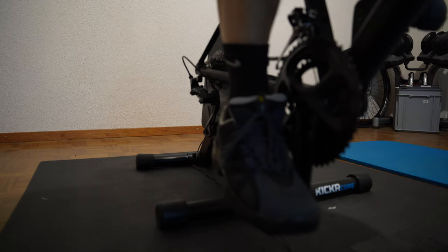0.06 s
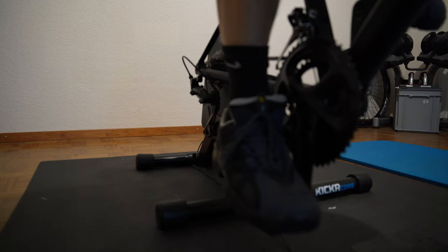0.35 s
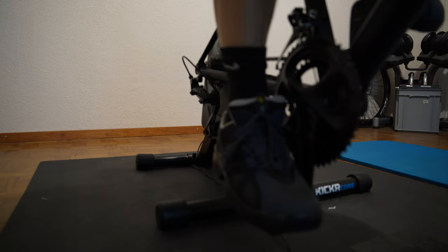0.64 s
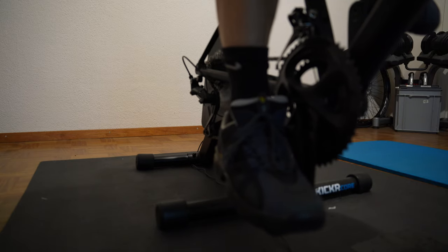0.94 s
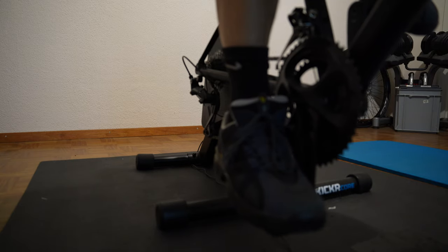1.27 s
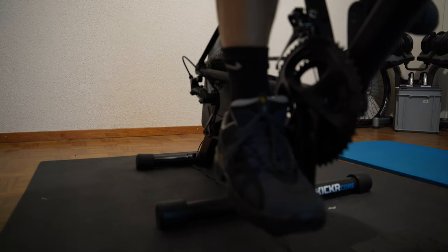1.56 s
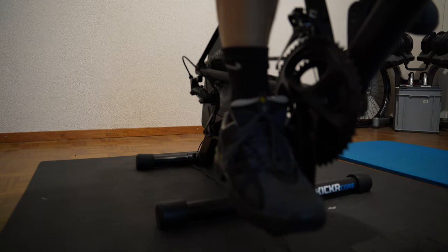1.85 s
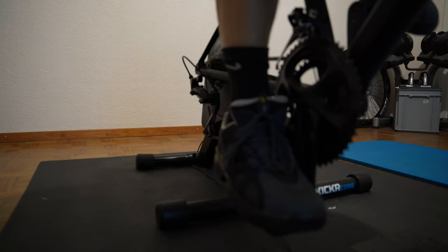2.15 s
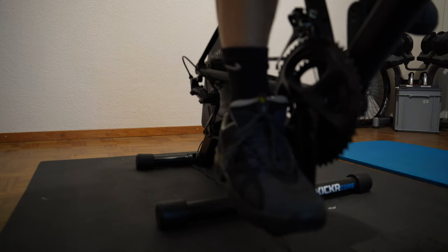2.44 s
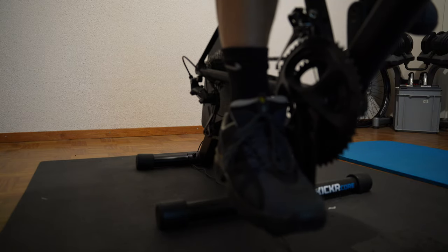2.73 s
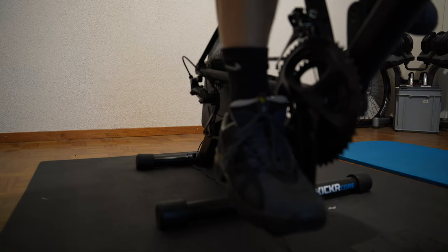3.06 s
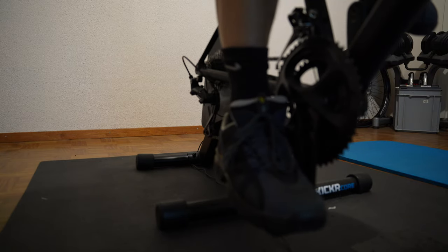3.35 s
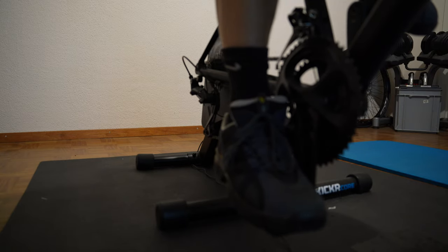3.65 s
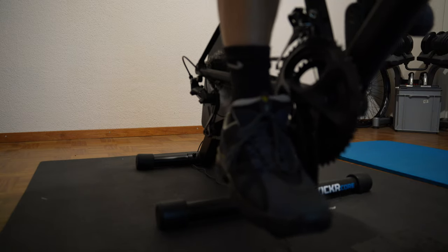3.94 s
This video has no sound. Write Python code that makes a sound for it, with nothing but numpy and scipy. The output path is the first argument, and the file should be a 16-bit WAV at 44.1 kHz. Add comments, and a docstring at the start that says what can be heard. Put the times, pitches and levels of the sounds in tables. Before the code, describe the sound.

Fast, bright ratchet clicking of a bike coasting on a trainer, slowing slightly.

```python
"""Bicycle coasting on an indoor trainer

A bare room in stereo, the pedals at rest. As the flywheel slows, the freehub pawls rattle over the
ratchet; their clicks set hub and sprockets ringing, louder once every turn. Underneath are a faint
whirr, the still air of the room and a low rumble that swells in the second half."""
import sys
import numpy as np
from scipy import signal
from scipy.fft import rfft, irfft
from scipy.io import wavfile
from scipy.ndimage import uniform_filter1d

SR = 44100
rng = np.random.default_rng(int(sys.argv[2]) if len(sys.argv) > 2 else 0)


def store_wav(level_fs):
    """Save 16-bit WAV to argv[1]."""
    pcm = np.round(np.clip(np.atleast_2d(level_fs), -1, 1) * 32767)
    wavfile.write(sys.argv[1], SR, pcm.T.astype(np.int16))


N = 176400
TIME = np.arange(N) / SR
TICK_DECAY_S, TICK_ECHO_S, TICK_SIDE_DB = .0007, .016, -2.5


def from_db(db):
    """Decibels to gain."""
    return 10 ** (np.asarray(db) / 20)


def rms_one(x):
    """Each channel scaled to rms 1."""
    return x / np.sqrt(np.mean(x ** 2, axis=-1, keepdims=True) + 1e-20)


def in_time(rows):
    """Straight lines through rows of time in seconds and value."""
    return np.interp(TIME, *np.transpose(rows))


def stereo(pair, side_db):
    """Mid and side to left and right."""
    return pair[0] + from_db(side_db) * pair[1] * np.array([[1], [-1]])


def colour(x, spectrum):
    """Gives a white signal a spectrum in dB per Hz."""
    hz, db = np.transpose(spectrum)
    grid_hz = np.maximum(np.arange(N + 1) * SR / (2 * N), 1)
    gain = from_db(np.interp(np.log(grid_hz), np.log(hz), db)) * np.sqrt(SR / 2)
    return irfft(rfft(rms_one(x), 2 * N) * gain)[..., :N]


def smooth_noise(spectrum, side_db):
    """Steady stereo noise of a given spectrum."""
    return stereo(colour(rng.standard_normal((2, N)), spectrum), side_db)


def drift(rate_hz):
    """Slow random wander in mid and side; rms 1."""
    pole = np.exp(-2 * np.pi * rate_hz / SR)
    wander = signal.lfilter([1], [1, -2 * pole, pole * pole], rng.standard_normal((2, N + SR)))
    return rms_one(wander[:, SR:])


def dying(energy, decay_s):
    """Spreads each burst of energy into a decay of the same sum; already running at the start."""
    pole = np.exp(-1 / (decay_s * SR))
    running = np.hstack([energy[..., -SR // 4:], energy]) + 1e-12
    return signal.lfilter([1 - pole], [1, -pole], running)[..., -N:]


def crunch(energy):
    """Noise that follows the energy of the contacts; mid and side."""
    return np.sqrt(energy) * rng.standard_normal((2, N))


def resonate(x, hz, width_hz):
    """One ringing mode with steep flanks."""
    radius = np.exp(-np.pi * width_hz / SR)
    section = [1, 0.0074, -0.959, 1, -2 * radius * np.cos(2 * np.pi * hz / SR), radius * radius]
    return signal.sosfilt([section] * 2, x)


def sustained(drive, hz, width_hz, even, window_s=.054):
    """A mode already ringing at the start, the share `even` of its level swings taken out; rms 1."""
    running = np.hstack([drive[:, -SR // 4:], drive])
    mode = rms_one(resonate(running, hz, width_hz)[:, -N:])
    power = np.abs(uniform_filter1d(mode ** 2, int(window_s * SR), axis=1)) + 1e-9
    return rms_one(mode / power ** (even / 2))


def room(x, tail_db, t60_s=.52, early_s=.0019, early_db=-4):
    """Direct sound, quick reflections off frame and floor, and a diffuse tail; mid and side."""
    t = TIME[:SR // 2]
    early = rms_one(rng.standard_normal((2, len(t))) * np.exp(-t / early_s))
    tail = rms_one(rng.standard_normal((2, len(t))) * from_db(-60 * t / t60_s))
    response = (from_db(early_db) * early + from_db(tail_db) * tail) / np.sqrt(len(t))
    response[:, 0] += 1
    running = np.hstack([x[:, len(t):0:-1], x])   # the room is already sounding at the start
    return signal.fftconvolve(running, response, axes=1)[:, len(t):len(t) + N]


def room_tone():
    """The still air of the room, almost mono."""
    # Spectrum of the air. Each row: frequency in Hz, density in dB per Hz.
    spectrum = [(20, -132), (42, -122), (75, -104), (120, -108), (195, -106), (250, -119), (320, -113),
                (420, -119), (700, -118), (3000, -122), (16000, -126)]
    return smooth_noise(spectrum, side_db=-32)


def flywheel_whirr():
    """The flywheel whirrs faintly in a band around 600 Hz."""
    # Spectrum of the whirr. Each row: frequency in Hz, density in dB per Hz before the gain.
    spectrum = [(250, -125), (450, -116), (540, -102), (630, -103), (750, -109), (1000, -116), (2000, -130)]
    # Its rise and fall. Each row: time in seconds, gain in dB.
    gain = [(0, 5), (.3, -0.5), (.65, -3.5), (.85, 2.5), (1.38, 3.5), (1.55, -4), (2.4, -3.5), (4, -7.5)]
    return smooth_noise(spectrum, side_db=-11) * from_db(in_time(gain))


def frame_rumble(side_db=-26):
    """Low rumble through the frame, with one humming resonance that rises with it."""
    # Spectrum of the rumble. Each row: frequency in Hz, density in dB per Hz before the gain.
    spectrum = [(25, -130), (50, -120), (72, -105), (100, -95), (116, -107), (136, -99), (165, -100),
                (186, -99), (205, -105), (222, -116), (400, -135)]
    # Swell of rumble and hum. Each row: time in seconds, gain in dB.
    gain = [(0, -7), (.05, -2), (.17, -16), (.8, -22), (1.35, -12), (1.7, -15), (1.95, -13.5), (2.38, -27),
            (2.53, -6), (2.82, 9.5), (3.03, 1.5), (3.16, 4), (3.26, -2), (3.35, 3), (3.42, 0), (3.58, 2.5),
            (3.65, -7), (3.79, 7), (3.85, -4), (3.96, 4), (4, -10)]
    mode = sustained(rng.standard_normal((2, N)), hz=165.2, width_hz=5.5, even=.82)
    hum = from_db(-75.5) * stereo(mode, side_db)
    return (smooth_noise(spectrum, side_db) + hum) * from_db(in_time(gain))


def stray_ticks(decay_s=.00075):
    """Now and then the drivetrain gives one sharp, broad tick."""
    # The ticks. Each row: start in seconds, relative level in dB.
    ticks = [(1.4666, -2), (1.578, 0), (3.7733, 3), (3.794, -3)]
    # Their spectrum. Each row: frequency in Hz, relative density in dB per Hz.
    spectrum = [(1500, -110), (4000, -97), (6000, -102), (9000, -100), (15000, -90)]
    energy = sum(from_db(db) ** 2 * (TIME > start) * np.exp(-abs(TIME - start) / decay_s)
                 for start, db in ticks)
    return stereo(colour(crunch(energy), spectrum), TICK_SIDE_DB) * np.sqrt(energy.mean())


def whine(drive):
    """A faint, narrow mode, fed by the clicks, that comes and goes."""
    # Course of the whine. Each row: time in seconds, relative level in dB.
    level = [(0,-79),(.25,-81),(.5,-72.5),(.66,-102),(.91,-68.5),(1.03,-81),(1.55,-93),(1.63,-78),(1.8,-72.5),(1.92,-99),(2.5,-91),(2.66,-78),(2.92,-96),(3.27,-79),(3.5,-90),(4,-86)]
    mode = sustained(drive, hz=923, width_hz=13, even=.5)
    return stereo(mode, side_db=-3) * from_db(in_time(level) - 3.5)


def hub_sizzle(drive):
    """A broad mode of the hub rings briefly on every click."""
    # The sizzle surges and sinks. Each row: time in seconds, relative level in dB.
    level = [(0.0, -58), (0.18, -71), (0.32, -54.5), (0.58, -70), (0.62, -52), (0.65, -68), (0.8, -54.5),
             (0.83, -61.5), (1.29, -58.5), (1.34, -68), (1.51, -58), (2.09, -64.5), (2.13, -54.5),
             (2.23, -68), (2.26, -56), (2.44, -78), (2.52, -59), (2.77, -58.5), (2.97, -78), (3.0, -61),
             (3.06, -68), (3.11, -54), (3.43, -69.5), (3.46, -57), (3.54, -66), (3.58, -59), (3.75, -65),
             (3.78, -56), (3.84, -71), (4.0, -62)]
    mode = sustained(drive, hz=4852, width_hz=150, even=.7)
    return stereo(mode, side_db=-2) * from_db(in_time(level) - 2)


def singing(drive, hz=3542.5, wander_hz=8, flutter_db=1.2):
    """The purest ring, probably the largest sprocket: kicked by the clicks, wavering a little."""
    # Its short bursts. Each row: time in seconds, relative level in dB.
    level = [(0.0, -55.5), (0.12, -63), (0.17, -56.5), (0.19, -74), (0.24, -56), (0.28, -68), (0.32, -55),
             (0.38, -63), (0.5, -53), (0.53, -65), (0.69, -59), (0.71, -80), (0.73, -54), (0.79, -51.5),
             (0.82, -64), (0.88, -49.5), (0.92, -67), (0.95, -52), (0.98, -67), (1.04, -54), (1.07, -63),
             (1.14, -56), (1.18, -69), (1.2, -55.5), (1.27, -50), (1.38, -67), (1.43, -57), (1.65, -62.5),
             (1.68, -49.5), (1.76, -59), (1.83, -50), (1.98, -66.5), (2.07, -55.5), (2.29, -56),
             (2.33, -66), (2.38, -55.5), (2.45, -64), (2.54, -57.5), (2.6, -63), (2.63, -56.5), (2.95, -53),
             (3.01, -71), (3.16, -49), (3.19, -84), (3.22, -51), (3.32, -56), (3.35, -72), (3.41, -57),
             (3.48, -83), (3.55, -52.5), (3.59, -64), (3.66, -50.5), (3.7, -61), (3.75, -48.5),
             (3.92, -58.5), (4.0, -57.5)]
    phase = 2 * np.pi * np.cumsum(hz + wander_hz * drift(rate_hz=24), axis=1) / SR
    kicked = np.sqrt(dying(drive ** 2, decay_s=.046))
    flutter = from_db(flutter_db * drift(rate_hz=24))
    tone = rms_one(np.sin(phase) * kicked * flutter)
    return stereo(tone, side_db=-13) * from_db(in_time(level) + .5)


def metal_ring(drive, turn, faster):
    """Hub and sprockets, kept ringing by the clicks; their modes swell or dip once a turn."""
    # Modes of the metal. Each row: frequency in Hz, width in Hz, base level in dB, side gain in dB,
    # swing over a turn in dB.
    modes = [(536, 35, -95.5, -15, 4.5), (619, 28, -99.5, -7, 3.5), (1029, 8.9, -89.5, -14, 11),
             (1322, 100, -71.5, -1, -2.5), (1412, 24, -69, -6.5, 3), (1649, 32, -72.5, -15, -1.5),
             (1812.5, 56, -68.5, -9.5, -2), (2057, 39, -74.5, -8.5, 5.5), (2308, 108, -69, -1.5, 0),
             (2685, 130, -69.5, 0, 1), (3545, 126, -63.5, -0.5, 1.5), (4636, 28, -78.5, 5.5, 10),
             (4807, 496, -61.5, 3.5, 0), (8615, 98, -59.5, 5, 1.5), (8676, 35, -57, -16, 1),
             (9370, 470, -62.5, 1.5, 1), (10800, 200, -66.5, 4, 1.5)]
    ring = 0
    for hz, width_hz, db, side_db, swing_db in modes:
        mode = sustained(drive, hz, width_hz, even=.16)
        ring = ring + stereo(mode, side_db) * from_db(db + swing_db * turn + .1257 * faster)
    return ring


def strikes(times, db, scatter_db=1.2):
    """An impulse of energy for each pawl contact, each with a strength of its own."""
    gains = from_db(db + scatter_db * rng.standard_normal(times.shape))
    inside = (times > 0) & (times < TIME[-1])
    return np.bincount((times[inside] * SR).astype(int), gains[inside] ** 2, N)


def knocks(energy, tail_db):
    """Each contact as a short burst of noise, heard through the room; mid and side."""
    return room(crunch(dying(energy, decay_s=.0008)), tail_db)


def snaps(energy, echo_db):
    """Each contact as a snap of noise with a brief wash of room echo; mid and side."""
    echoes = from_db(echo_db) ** 2 * dying(energy, TICK_ECHO_S)
    return crunch(dying(energy, TICK_DECAY_S) + echoes)


def pawl_pings(energy):
    """The small pawls ring high for a moment as they land and bounce."""
    # Modes of the pawls. Each row: frequency in Hz, width in Hz, level in dB, side gain in dB.
    modes = [(13100, 380, -63, -2), (15530, 520, -60.5, 0)]
    drive = snaps(energy, echo_db=-1.5)
    return sum(stereo(rms_one(resonate(drive, hz, width_hz)), side_db) * from_db(db)
               for hz, width_hz, db, side_db in modes)


def housing_clatter(energy):
    """The contacts knock the housing into a midrange clatter."""
    # Spectrum of the housing. Each row: frequency in Hz, base density in dB per Hz.
    spectrum = [(60, -155), (400, -123), (850, -114), (1050, -101), (1220, -90.5), (1380, -87.5),
                (1550, -95.5), (1750, -89.5), (1950, -93), (2150, -94), (2700, -96), (3100, -101.5),
                (3700, -102), (4300, -108), (5500, -130)]
    return stereo(colour(knocks(energy, tail_db=2.5), spectrum), side_db=-5)


def pawl_ticks(energy, rise_s=.00025):
    """The bright tick of the pawls striking the ratchet."""
    # Spectrum of the tick. Each row: frequency in Hz, base density in dB per Hz.
    spectrum = [(3000, -120), (4000, -109), (5100, -99), (5400, -108), (5750, -121), (6400, -121),
                (6900, -104), (7600, -100), (7950, -92.5), (8300, -94.5), (9400, -95.5), (10100, -103),
                (10800, -96.5), (11600, -92), (12150, -94), (12700, -92.5), (13600, -92), (14200, -96.5),
                (14800, -92.5), (15600, -96.5)]
    clicks = snaps(dying(energy, rise_s), echo_db=4.8)
    return stereo(colour(clicks, spectrum), TICK_SIDE_DB)


def freehub(teeth=24, start_tooth=.186, hardest_tooth=21.9, jitter_s=.0004):
    """The pawls drop off every tooth: a bright tick, a clatter in the housing and ringing metal."""
    # The slowing ratchet. Each row: time in seconds, speed in teeth per second.
    ratchet_speed = [(0, 57.23), (.2, 56.84), (.42, 53.81), (.68, 56.25), (.9, 53.91), (1.2, 52.93),
                     (1.55, 51.44), (1.9, 50.61), (2.3, 49.44), (2.7, 48.29), (3.2, 46.74), (3.7, 45.32),
                     (4, 45.77)]
    # Pawl contacts on each tooth. Each row: delay in teeth, then relative levels in dB of tick,
    # housing, ring and ping.
    contacts = [(-.04, 0, -1.5, -7, 0), (.03, -8, -11, -6, -9), (.13, -18, -3, -2, -18),
                (.25, -12, -4, -6, -4), (.45, -17, -9, -15, -20), (.63, -18, -12, -3, -25)]
    delay, tick_db, housing_db, ring_db, ping_db = np.transpose(contacts)
    speed = in_time(ratchet_speed)
    faster = speed - speed.mean()
    tooth = start_tooth + np.cumsum(speed) / SR
    turn = np.cos(2 * np.pi * (tooth - hardest_tooth) / teeth)   # 1 where the pawls strike hardest
    contact_teeth = np.arange(int(tooth[-1]) + 1)[:, None] + delay
    times = np.interp(contact_teeth, tooth, TIME, left=-1, right=-1)
    times += jitter_s * rng.standard_normal(times.shape)
    ticks = pawl_ticks(strikes(times, tick_db)) * from_db(.5 * turn + .03 * faster)
    clatter = housing_clatter(strikes(times, housing_db)) * from_db(.5 * turn + .24 * faster)
    drive = knocks(strikes(times, ring_db), tail_db=3.5)
    ringing = metal_ring(drive, turn, faster) + singing(drive) + hub_sizzle(drive) + whine(drive)
    return ticks + clatter + ringing + pawl_pings(strikes(times, ping_db))


def scene():
    """The coasting bicycle and its room, as they reach the microphone."""
    return flywheel_whirr() + freehub() + stray_ticks() + frame_rumble() + room_tone()


def record(dry):
    """A dip in the treble around 6 kHz, then a steep cut at the top."""
    dip_hz, width_hz, cutoff_hz = 5955, 1560, 15750
    dipped = signal.lfilter(*signal.iirnotch(dip_hz, dip_hz / width_hz, fs=SR), dry)
    return signal.sosfilt(signal.ellip(12, .1, 80, cutoff_hz, fs=SR, output="sos"), dipped)


dry = scene()
out = record(dry)
store_wav(out)
```